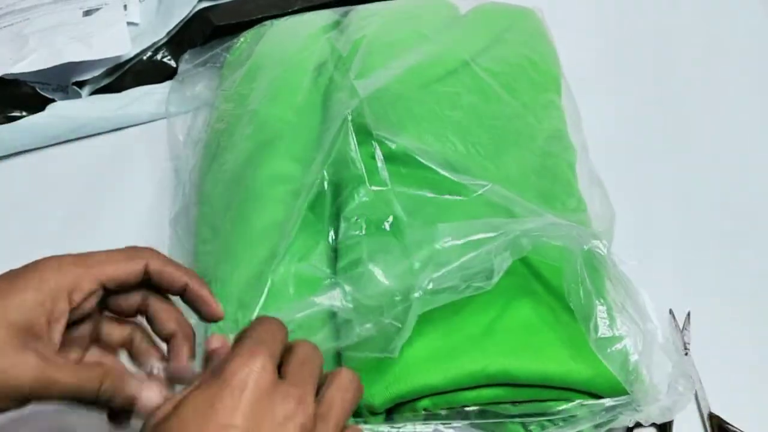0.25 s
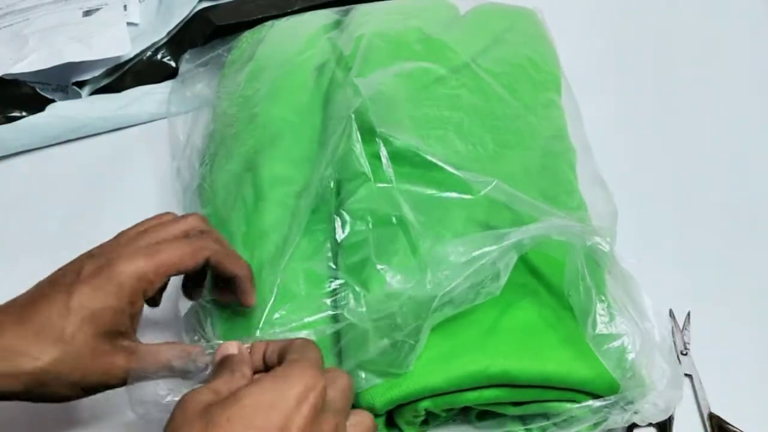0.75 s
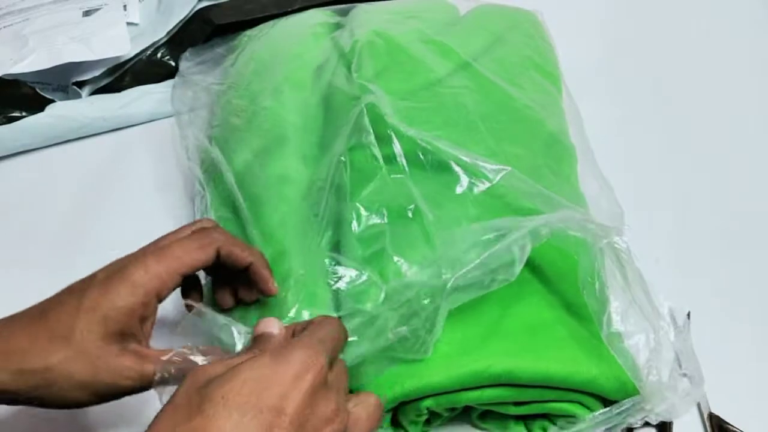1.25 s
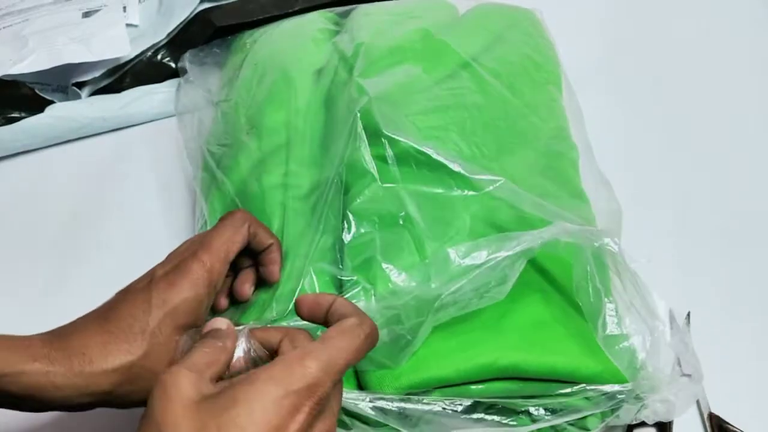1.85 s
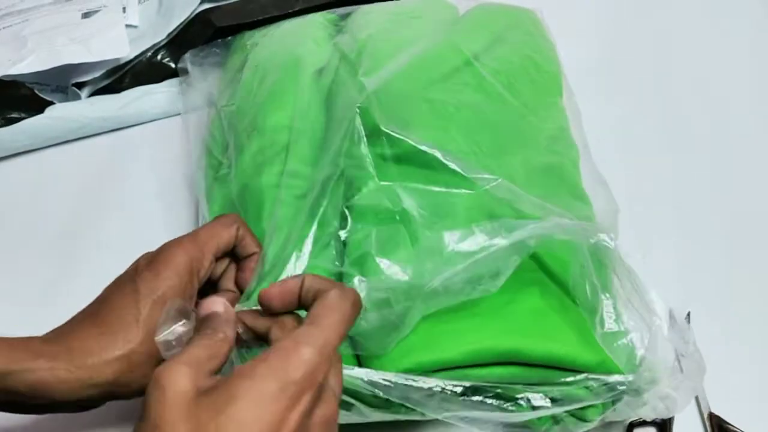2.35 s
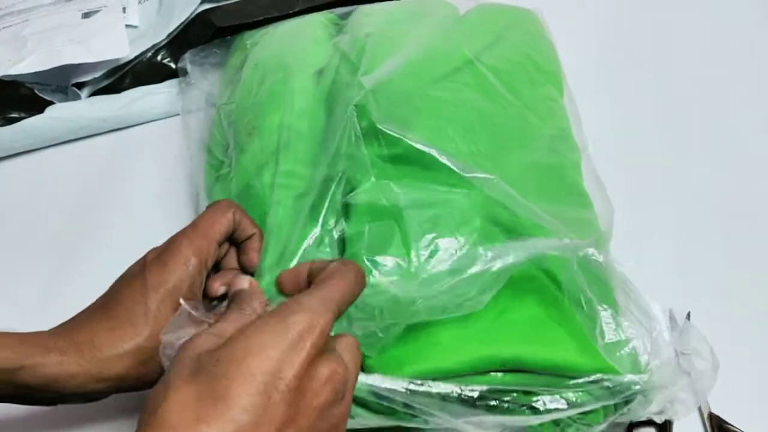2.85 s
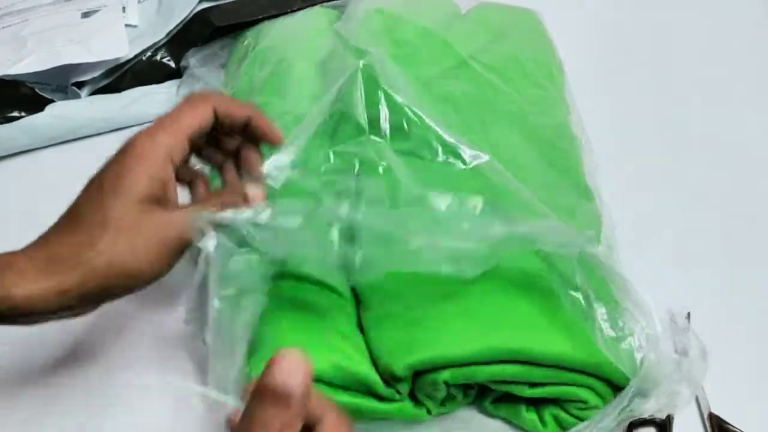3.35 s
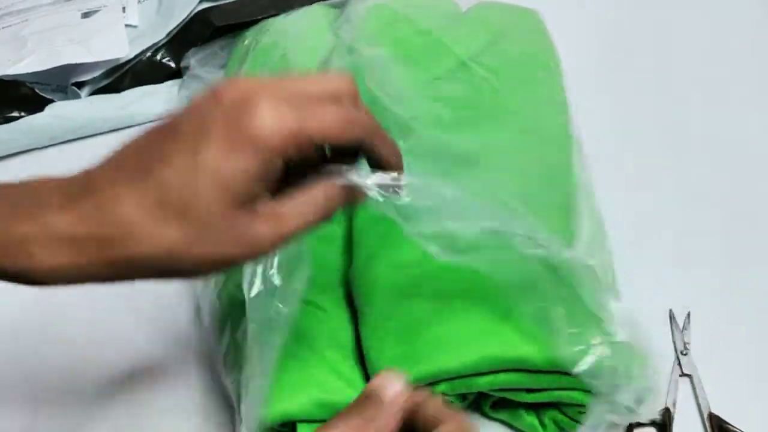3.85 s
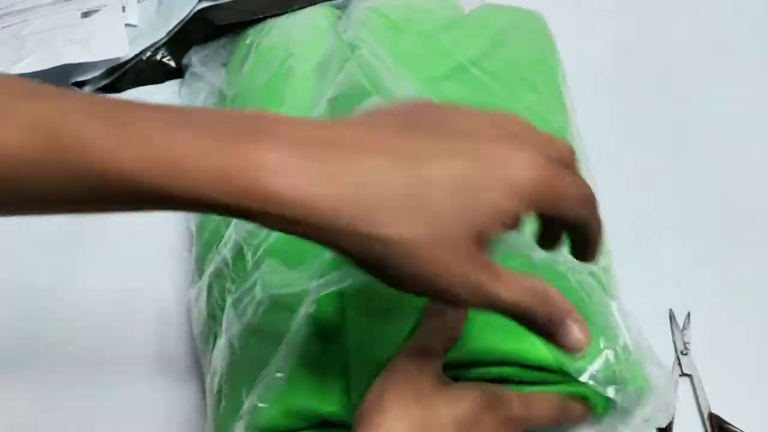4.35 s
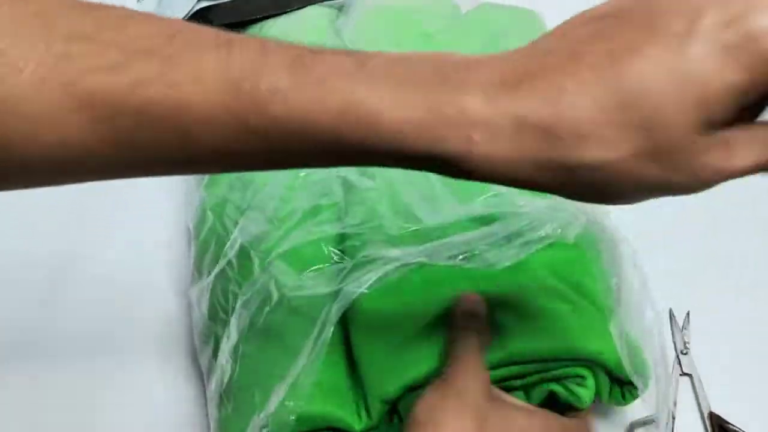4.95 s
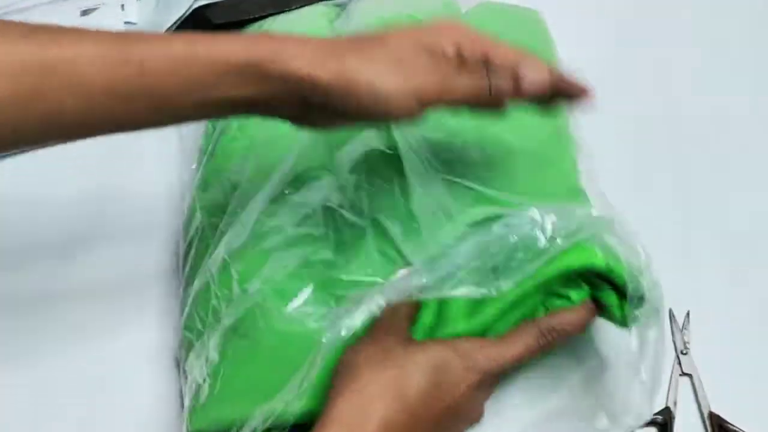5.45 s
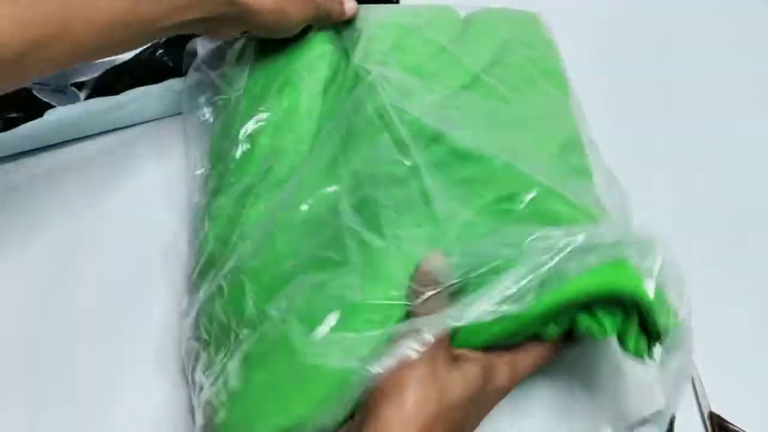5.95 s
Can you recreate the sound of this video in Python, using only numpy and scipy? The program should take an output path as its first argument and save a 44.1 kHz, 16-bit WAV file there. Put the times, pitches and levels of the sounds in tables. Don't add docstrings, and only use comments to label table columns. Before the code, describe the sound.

A thin polythene bag is handled very close to a stereo microphone, in a small room with short reflections and a faint steady hum. From 0 to 1.4 seconds, light irregular crinkling and tiny dry clicks, slightly right of centre, with brief lulls. From 1.5 to 1.9 the film gives in strong, separate snaps, with a soft low thump near 1.7. After quieter crackle, a dense, bright tearing burst hits at 2.3 and dies fast, with another snap at 2.4. Between 2.84 and 3.03 a hard rip breaks in several loud pops, with a dull table thud at its end and another near 3.4. Then loose film rustles more gently, swelling around 3.9 and 4.7, shifting leftward. It almost stops near 5.1, rustles briskly at 5.2, then fades to small crackles, soft bumps and a slight renewed crinkle by 6.1.

```python
import sys
import numpy as np
from scipy import signal
from scipy.fft import rfft, irfft
from scipy.io import wavfile

SR = 44100
rng = np.random.default_rng(int(sys.argv[2]) if len(sys.argv) > 2 else 0)


def unload_audio(sound):
    columns = np.transpose(np.atleast_2d(sound))
    steps = np.round(np.clip(columns, -1, 1) * 32767)
    wavfile.write(sys.argv[1], SR, steps.astype(np.int16))


def gain_from_db(level_db):
    decades = np.asarray(level_db, float) / 20
    return 10 ** decades


N = 272538
SNAP_PAN_SPREAD_DB = 2.2

# [t/s, left port lag/samples, left-right level/dB]
HANDS = [
    (0, 6, -1.3),
    (1.5, 6.5, -1.4),
    (4.1, 6, -0.1),
    (4.5, -1, 1.5),
    (6.18, -3, -0.5),
]


def rms_one(x):
    return x / np.sqrt(np.mean(x ** 2) + 1e-20)


def in_time(rows, s):
    table = np.array(rows)
    return [np.interp(s, table[:, 0], column) for column in table[:, 1:].T]


def at_hz(points, hz):
    table = np.array(points)
    return np.interp(np.log(hz), np.log(table[:, 0]), table[:, 1])


def drift(rate_hz):
    r = np.exp(-2 * np.pi * rate_hz / SR)
    noise = rng.standard_normal(N + SR)
    return rms_one(signal.lfilter([1], [1, -2 * r, r * r], noise)[SR:])


def diffuse(hz, length):
    # [f/Hz, share]
    likeness = [(100, 0.81), (300, 1), (700, 0.36), (1500, 0.032), (4000, 0.0082)]
    mid, side = rfft(rng.standard_normal((2, length)))
    alike = np.clip(at_hz(likeness, hz), 0, 1)
    return np.sqrt(1 + alike) * mid + np.sqrt(1 - alike) * side * [[1], [-1]]


def hum():
    # [f/Hz, density/dB per Hz]
    hum_spectrum = [(25, -8), (45, -22), (65, -8), (95, -3), (130, 3.5), (300, -13), (550, -3.5),
                    (1100, -10), (2600, -19), (3800, -21), (6400, -20), (9000, -22.5), (16000, -33)]
    hz = np.maximum(np.fft.rfftfreq(N, 1 / SR), 1)
    noise = irfft(diffuse(hz, N) * gain_from_db(at_hz(hum_spectrum, hz)), N)
    return gain_from_db(-68.5) * rms_one(noise)


def thrust_db():
    # [t/s, peak level/dB]
    thrusts = [(1.72, -55), (2.49, -64), (3.01, -49.5), (3.3, -58), (3.42, -48.5), (3.85, -60), (4.0, -59),
               (4.7, -53.5), (5.2, -62), (5.82, -60), (6.1, -63)]
    rise_db_per_s, fall_db_per_s, rest_db = 81, 91, -71
    at_s, peak_db = np.transpose(thrusts)[:, :, None]
    since_s = np.arange(N) / SR - at_s
    each_db = peak_db + np.where(since_s < 0, rise_db_per_s, -fall_db_per_s) * since_s
    return np.maximum(each_db.max(axis=0), rest_db)


def rumble(low_hz=65, high_hz=150, side_db=-11):
    sos = signal.butter(3, [low_hz, high_hz], "band", fs=SR, output="sos")
    mid, side = rms_one(signal.sosfilt(sos, rng.standard_normal((2, N))))
    return gain_from_db(thrust_db() - 7.0) * (mid + gain_from_db(side_db) * side * [[1], [-1]])


def response(walls_db=-7, build_s=0.0029):
    # [delay/s, left level/dB, right level/dB]
    echoes = [
        (.0026, -19.5, -19),
        (.0045, -29.5, -15),
        (.0092, -19.5, -20),
    ]
    # [f/Hz, T60/s]
    room_t60 = [(150, 0.52), (1000, 0.26), (6000, 0.22), (15000, 0.049)]
    length = SR // 2
    s = np.arange(length) / SR
    hz = np.maximum(np.arange(length // 2 + 1) * 2, 1)
    noise, tail = diffuse(hz, length), 0
    for centre_hz in 125 * 2 ** np.arange(8):
        octave = np.cos(np.pi / 2 * np.clip(np.log2(hz / centre_hz), -1, 1)) ** 2
        tail = tail + irfft(noise * octave) * gain_from_db(-60 * s / at_hz(room_t60, centre_hz))
    tail = tail * (1 - np.exp(-s / build_s))
    out = gain_from_db(walls_db) * tail / np.sqrt(np.sum(tail ** 2, axis=1, keepdims=True))
    out[:, 0] = 1
    for delay_s, left_db, right_db in echoes:
        out[:, round(delay_s * SR)] += gain_from_db(np.array([left_db, right_db]))
    return out


def room(x, count=6, place_s=0.06):
    place = np.arange(N) / (place_s * SR)
    out = 0
    for k in range(count):
        distance = np.abs((place - k + count / 2) % count - count / 2)
        share = np.clip(1 - distance, 0, 1)
        out = out + signal.fftconvolve(x * share, response(), axes=1)[:, :N]
    return out


def ports(x, low_cut_hz=165):
    # [f/Hz, width/Hz, level/dB]
    port_peaks = [
        (250, 17, 4),
        (760, 1340, -3),
        (4116, 1630, -10.5),
        (6146, 1340, 8.5),
        (8260, 5500, -11.5),
        (15560, 2900, 10),
    ]
    for hz, width_hz, db in port_peaks:
        w, g = 2 * np.pi * hz / SR, gain_from_db(db / 2)
        a = np.tan(np.pi * width_hz / SR)
        x = signal.lfilter([1 + a * g, -2 * np.cos(w), 1 - a * g], [1 + a / g, -2 * np.cos(w), 1 - a / g], x)
    return signal.sosfilt(signal.butter(4, low_cut_hz, "high", fs=SR, output="sos"), x)


def fold_filters():
    fold_edges_hz = [600, 3800, 8200]
    low, mid, high = fold_edges_hz
    ranges = [(low, "low"), ([low, mid], "band"), ([mid, high], "band"), (high, "high")]
    return [signal.butter(2, edge, kind, fs=SR, output="sos") for edge, kind in ranges]


def unit_peak(sos):
    return np.abs(ports(signal.sosfilt(sos, np.eye(1, 2048)[0]))).max()


def at_ports(at, sizes, lag, pan_db):
    trains = np.full((2, N + 64), 1e-18)
    left_at = np.clip(at + np.round(lag).astype(int), 0, N)
    np.add.at(trains[0], left_at, sizes * gain_from_db(pan_db / 2))
    np.add.at(trains[1], at, sizes * gain_from_db(-pan_db / 2))
    return trains[:, :N]


def clicks(delay_s=0.00046):
    # [t/s, peak level/dB, folds re peak/dB, fine creases re peak/dB]
    lone_clicks = [(0.0188, -39, -15, -5), (0.049, -47, -22, -7), (0.0835, -41, -8, -4),
                   (0.1513, -44, -4, -14), (0.1964, -51, -14, -8), (0.3073, -43.5, 0, -10),
                   (0.3709, -51, -11, -14), (0.431, -41, -13, -11), (0.488, -46, -9, -10),
                   (0.5433, -41, -9, -1), (0.6289, -49, -13, 11), (0.6969, -55, -10, -7),
                   (0.7035, -51, 0, -5), (0.75, -43, -5, -17), (0.7869, -48, -6, -18),
                   (0.7945, -55, -7, -1), (0.821, -38, -10, -13), (0.8402, -39, -10, -13),
                   (0.8456, -43, -3, -8), (0.865, -41, -9, -15), (0.93, -37, -6, -10),
                   (1.0375, -49, -18, -5), (1.1697, -36, -10, -9), (1.2776, -37.5, -3, -15),
                   (1.314, -45, -22, -13), (1.3298, -44, -10, 2), (1.387, -50, -14, -6),
                   (1.4384, -42, -23, -9), (1.4875, -28.5, -10, -11), (1.5363, -40, -9, -9),
                   (1.6728, -27, -9, -10), (1.9901, -47, -10, -13), (2.098, -38, -13, -3),
                   (2.1226, -44, -20, -5), (2.1402, -49, -19, -14), (2.1476, -44, -11, -6),
                   (2.1675, -36, -8, -11), (2.2035, -31, -3.5, -13), (2.2368, -44, -9, -12),
                   (2.2546, -37, -4, -15), (2.276, -40, -16, -16), (2.2921, -19, 0, -8),
                   (2.5617, -39, -16, 1), (2.587, -49, -17, -14), (2.6945, -47, -7, -13),
                   (2.7168, -45, -8, -12), (2.7542, -31, -17, -15), (2.8292, -38, -8, -9),
                   (3.141, -46, -16, 6),
                   (3.1863, -49, -19, -10), (3.2514, -36, -10, -4), (3.3552, -35.5, -9, -13),
                   (3.359, -37, -13, -14), (3.3859, -55, -10, 0), (3.5945, -50, -11, 2),
                   (3.6384, -43, -8, -9), (3.6796, -41, 0, -7), (3.7331, -49, -21, -15),
                   (3.8091, -46, -9, 3), (3.8544, -38, -7, -3), (4.1821, -47, -5, -19),
                   (4.2731, -53, -11, -14), (4.2891, -41, -16, -12), (4.3268, -48, -22, -10),
                   (4.4019, -44, -10, -11), (4.4324, -52, -10, -9), (4.4429, -44, -7, -6),
                   (4.4572, -38, -2, -8), (4.5051, -48, -9, -10), (4.6178, -40, -14, -1),
                   (4.6659, -49, -14, -13), (4.7119, -37, -10, -8), (4.7658, -29, -17, -3),
                   (4.7909, -32.5, -17, 5), (4.8404, -39, -17, -12), (4.9258, -48, -19, -14),
                   (4.9648, -46.5, -5, -13), (5.0365, -55.5, -12, -20), (5.0738, -61, -14, -13),
                   (5.1341, -50, -10, -10), (5.1437, -39, -17, -5), (5.1613, -40, -15, -9),
                   (5.1803, -28, -14, -10), (5.3416, -50, -2, -11), (5.3545, -47, -7, -12),
                   (5.41, -32, -26, -10), (5.4436, -37.5, -6, -9), (5.5502, -54, -10, -17),
                   (5.5615, -44, -10, -7), (5.6529, -46, -11, -16), (5.7227, -48, -9, -6),
                   (5.7519, -46, -15, -14), (5.7926, -56, -9, -4), (5.8842, -43, -6, -13),
                   (5.9165, -42, -2, -10), (6.0476, -42, -19, -10), (6.0783, -41, -7, -4),
                   (6.101, -41, -20, -13)]
    click_trim_db = [-13, 4, 3.5, 7]
    s, peak_db, fold_db, fine_db = np.transpose(lone_clicks)
    chance = rng.standard_normal((len(s), 3))
    lag, pan_db = in_time(HANDS, s)
    lag = lag + 1.6 * chance[:, 0]
    pan_db = pan_db + SNAP_PAN_SPREAD_DB * chance[:, 1]
    at = np.round(SR * (s + delay_s)).astype(int)
    out = 0
    for k, (sos, rel_db) in enumerate(zip(fold_filters(), [fold_db, fold_db, 0 * s, fine_db])):
        sizes = np.sign(chance[:, 2]) * gain_from_db(peak_db + rel_db + click_trim_db[k]) / unit_peak(sos)
        out = out + (-1) ** k * signal.sosfilt(sos, at_ports(at, sizes, lag, pan_db))
    return ports(out)


def panels(at, level_db, panel_hz, lag, pan_db, trim_db=-5, cycles=15):
    step = np.arange(1024)
    turns = panel_hz[:, None] * step / SR
    rings = gain_from_db(level_db[:, None] + trim_db - 60 * turns / cycles) * np.sin(2 * np.pi * turns)
    ring_at = np.minimum(at[:, None] + step, N)
    return at_ports(ring_at.ravel(), rings.ravel(), np.repeat(lag, step.size), np.repeat(pan_db, step.size))


def snaps(first_db=6, fade_db=-0.23, uneven_db=3, rise_s=.0006, burst_s=.0026, count=10):
    # [t/s, peak level/dB, folds re peak/dB, panel f/Hz]
    picking = [(0.019, -39.5, 0, 507), (0.0874, -38.5, -6, 2120), (.11, -38, -17, 880),
               (0.205, -41, -4, 1540), (.2209, -40, -29, 1030), (0.266, -43, 1, 960),
               (0.339, -44, 6.5, 2150), (0.3877, -37.5, -33, 1730), (0.4181, -40.5, 4.5, 1460),
               (0.445, -46, -2, 501), (0.4977, -38, -9, 650), (0.526, -34.5, -16, 824),
               (.606, -51, -27, 627), (0.637, -40, -17, 1240), (0.749, -52, 9.5, 1960),
               (0.948, -34.5, -27, 2440), (1.0239, -30, -13, 1720), (1.1174, -37.5, -23, 770),
               (1.15, -38, -8, 1470), (1.2124, -32.5, -12, 520), (1.265, -35.5, -16, 1350),
               (1.3514, -31.5, -18, 900), (1.3414, -32.5, -11, 905), (1.3472, -33, -27, 797),
               (1.417, -37.5, -25, 519), (1.461, -36, -26, 517), (1.479, -24.5, -33, 799)]
    seam = [(1.5479, -22, -10, 1960), (1.5915, -18.5, -0.5, 1520), (1.677, -15, -5, 1900),
            (1.7137, -17, -0.5, 1530), (1.7267, -21, -1.5, 950), (1.7301, -23, -3, 1500),
            (1.685, -32, -6, 1200), (1.753, -18, -1.5, 930), (1.8429, -16, -1.5, 838),
            (1.8792, -12, -6, 653), (2.0185, -46, -11, 603), (2.0686, -31.5, -17, 1302),
            (2.081, -31.5, -17, 2220), (2.162, -41, 2, 1520), (2.4053, -18, -9.5, 605),
            (2.5397, -38, -24, 1790), (2.5578, -35, -26, 807), (2.6481, -30.5, -11, 830),
            (2.7432, -36, 5.5, 1500), (2.764, -34.5, -0.5, 1200)]
    tear = [(2.284, -25.5, -5, 1510), (2.2868, -17.5, 0.5, 970), (2.2895, -23, -2, 1900),
            (2.293, -24, 4, 1230), (2.2955, -23.5, -1, 900), (2.3025, -20, -8, 2100),
            (2.3095, -17, -2.5, 1110), (2.3245, -19, -8, 1300), (2.3375, -22, 0.5, 1400),
            (2.345, -30, -3, 1800), (2.300, -16.5, -6, 910), (2.308, -28, -5, 990), (2.312, -18, -19, 900),
            (2.317, -24, -3, 1930), (2.32, -18.5, 0.5, 1100), (2.329, -22, 4, 980), (2.335, -24, -10, 1090),
            (2.3392, -22, -11, 2100), (2.353, -24.5, -4, 1520), (2.362, -28, -26, 900)]
    rip = [
        (2.8377, -21, -3.5, 570),
        (2.8737, -20.5, 2, 820),
        (2.8767, -17.5, -0.5, 835),
        (2.8801, -28, -6, 1510),
        (2.8892, -16.5, -9, 651),
        (2.9428, -19, -4, 815),
        (2.9884, -15.5, -4.5, 517),
        (3.0218, -25.5, -0.5, 1410),
        (3.027, -26, -7, 511),
        (3.0349, -26.5, 0.5, 1140),
    ]
    opening = [(3.2003, -31.5, -30, 2050), (3.4055, -30.5, -16, 2130), (3.5115, -39.5, 1, 1550),
               (3.6208, -41, 0, 900), (3.7509, -33.5, 0, 2800), (3.839, -39, -6, 620),
               (3.8799, -33.5, -9, 1383), (3.9505, -29, -13, 536), (4.009, -42, -10, 3180),
               (4.044, -43, -22, 501), (5.768, -48, 7.5, 970), (5.805, -50.5, 8, 980), (5.84, -48, 5, 596),
               (5.858, -43.5, 4.5, 1500), (5.913, -43, 2, 523), (6.152, -40, 3, 1800),
               (6.163, -40, 3, 1750), (6.062, -52, -4, 700), (4.517, -39, 7, 1670), (4.578, -31.5, -9, 824),
               (4.611, -32, -7, 790), (4.7084, -30, -18, 1440), (5.1929, -33, -25, 506),
               (5.2932, -37, -14, 2430), (5.489, -41.5, -3, 1490), (5.604, -39.5, -14, 1000),
               (5.878, -48, -7, 620), (6.0647, -47, -27, 510), (6.083, -35, -23, 1490)]
    knocks = [(4.233, -57.5, 9, 330), (4.7, -51, 12.5, 350), (3.6, -63, 11, 370), (4.277, -56, 13, 460),
              (5.9, -55, 13, 560), (4.291, -56, 11, 400), (4.301, -52, 14, 400), (4.312, -63, 10, 340),
              (2.989, -36, 7.5, 238), (2.5, -40, -25, 220), (0.014, -50, 8, 540), (5.85, -56, 10, 580),
              (6.07, -51, 14, 600), (6.15, -53, 13, 450), (3.01, -43, 7, 190)]
    # [t/s, peak level/dB]
    ticks = [(.11, -46), (0.607, -43.5), (0.9483, -54), (1.5923, -27), (1.676, -50), (1.7137, -27),
             (2.352, -40), (2.6477, -57), (2.9869, -23), (3.949, -38), (4.7077, -40), (5.1938, -46),
             (5.2918, -52), (5.8764, -44), (6.083, -45), (3.2006, -56), (3.57, -62), (3.68, -51),
             (4.045, -41), (4.899, -59), (1.0245, -40), (.388, -55), (1.8423, -27), (1.8777, -42),
             (2.8893, -50), (4.98, -68), (5.49, -62), (5.565, -62), (5.655, -53), (5.725, -60), (5.83, -56),
             (5.918, -56), (5.98, -54)]
    snap_trim_db = [-7.5, -4, -0.74, -2.5]
    after_db = [-33, -6, -4.5, -2]
    tick_fold_db, tick_hz, tick_fine_db, tick_after_db = -1.5, 1970, 29, -7
    knock_broad_db, knock_dull_db = 26, -25
    colour_db = 6.5

    tick_rows = [(t, db, tick_fold_db, tick_hz) for t, db in ticks]
    rows = picking + seam + tear + rip + opening + knocks + tick_rows
    s, peak_db, fold_db, panel_hz = np.transpose(rows)
    index = np.arange(len(s))
    tick = index >= len(s) - len(ticks)
    knock = (index >= len(s) - len(knocks) - len(ticks)) & ~tick
    chance = rng.standard_normal((len(s), 4, count))

    broad_db = -22 + 0.16 * fold_db - 1.5 * np.log2(panel_hz / 1000) + knock_broad_db * knock
    broad_db = broad_db + colour_db * chance[:, 3, 2]
    fine_db = -14 + tick_fine_db * tick + colour_db * chance[:, 3, 3]
    dull_db = knock_dull_db * knock
    rel_levels_db = [broad_db, fold_db + dull_db, dull_db, fine_db + dull_db]

    step = np.arange(count)
    after_s = burst_s * step / count * np.exp(.3 * chance[:, 0])
    at = np.round(SR * (s[:, None] + rise_s + after_s)).astype(int)
    run_db = np.where(step, fade_db * step + uneven_db * chance[:, 2], first_db)
    run = np.sign(chance[:, 1]) * gain_from_db(run_db)
    lag, pan_db = in_time(HANDS, s)
    lag = lag + 1.6 * chance[:, 3, 1]
    pan_db = pan_db + SNAP_PAN_SPREAD_DB * chance[:, 3, 0]

    out = panels(at[:, 0], peak_db + fold_db, panel_hz, lag, pan_db)
    for k, (sos, rel_db) in enumerate(zip(fold_filters(), rel_levels_db)):
        moved = run * gain_from_db((after_db[k] + tick_after_db * tick[:, None]) * (step > 0))
        sizes = moved * gain_from_db(peak_db + rel_db + snap_trim_db[k])[:, None] / unit_peak(sos)
        trains = at_ports(at.ravel(), sizes.ravel(), np.repeat(lag, count), np.repeat(pan_db, count))
        out = out + (-1) ** k * signal.sosfilt(sos, trains)
    return ports(out)


def pause_db(s):
    # [centre t/s, depth/dB (negative: a brief swell), sink/s, recover/s]
    pauses = [(.62, 11, 0.028, .01), (1.426, 10, 0.073, 0.015), (2.28, 3.5, 0.015, .003),
              (2.98, -1, .03, .005), (2.866, 13, 0.017, .006), (2.935, 5, .02, .005),
              (3.6, 5.5, 0.08, 0.016), (4.2, 4.5, 0.22, 0.075), (4.37, 9, 0.077, 0.018),
              (5.115, 13, 0.2, 0.0066), (5.53, 9.5, 0.025, 0.032), (5.71, 5.5, 0.029, 0.039),
              (4.95, 2.5, 0.088, 0.037), (1.585, -7, 0.026, .005), (1.668, 5, 0.035, .005),
              (1.838, 9, 0.043, .004), (4.26, 0.5, 0.072, .06), (5.98, 4.5, 0.07, 0.031)]
    at_s, depth_db, sink_s, recover_s = np.transpose(pauses)[:, :, None]
    since_s = s - at_s
    distance = np.where(since_s < 0, -since_s / sink_s, since_s / recover_s)
    return -np.sum(depth_db * np.clip(1 - distance, 0, 1), axis=0)


def fold_levels():
    # [t/s, effort/dB, tautness/dB]
    handling = [(0, -59, 3), (.23, -57, -3), (.29, -75, 5), (.31, -56.5, 0.5), (.75, -61.5, -3.5),
                (1.0, -54.5, 3.5), (1.43, -54, 2.5), (1.96, -51.5, 2.5), (2.8, -54, 1.5), (3.6, -57.5, 1),
                (4.1, -50, -3.5), (4.2, -63.5, -15), (4.33, -68, 8), (4.4, -76, 7), (5.0, -86, 14),
                (5.12, -96, 9), (5.25, -54.5, -2.5), (5.93, -56.5, -5.5), (6.18, -47.5, 1.5)]
    # [start t/s, rise/s, peak level/dB, fall/dB per s, tautness/dB]
    tugs = [(0, 0.03, -49.5, 400, 8), (1.431, 0.064, -50, 142, -1), (1.6, 0.16, -52, 98, 19),
            (1.832, 0.017, -58, 75, 23), (2.285, 0.0055, -31, 165, 10), (2.5, 0.052, -59, 97, 15),
            (2.84, 0.038, -37, 180, 9), (2.985, 0.012, -39, 151, 9), (3.63, 0.046, -54, 94, 5),
            (3.829, 0.059, -43.5, 79, 1), (3.9, 0.03, -49, 70, -1), (3.96, 0.022, -54, 80, 12),
            (4.03, 0.039, -53.5, 72, -9), (4.42, 0.052, -51.5, 37, 4.5), (4.38, 0.025, -60, 30, 1),
            (4.5, 0.19, -45.5, 62, 1), (4.74, 0.061, -52.5, 110, -1), (5.125, 0.083, -44, 298, 4),
            (5.53, 0.14, -55.5, 203, 0), (5.75, 0.023, -59.5, 200, -10), (5.82, 0.03, -56.5, 120, -5),
            (5.89, .025, -58, 150, -4), (3.15, 0.12, -54, 98, 1), (3.36, 0.093, -55.5, 120, 1),
            (6.02, 0.03, -57, 102, 16), (.5, 0.051, -56.5, 73, 8)]
    fold_base_db = [-6, -1, -0.5, -12.5]
    effort_shares = [.9, .95, 1.01, 1.3]
    taut_shares = [-0.48, -0.18, 0.52, 0.93]
    middle_db, swell_db = -52, 8.5
    s = np.arange(0, N, 32) / SR
    start_s, rise_s, peak_db, fall_db_per_s, tug_taut = np.transpose(tugs)[:, :, None]
    since_s = s - start_s - rise_s
    shape_db = np.where(since_s < 0, swell_db * since_s / np.maximum(rise_s, .002), -fall_db_per_s * since_s)
    tug_db = peak_db + shape_db - 60.0 * (s < start_s)
    steady_db, steady_taut = in_time(handling, s)
    effort = np.vstack([steady_db, tug_db]) + pause_db(s) - middle_db
    taut = np.vstack([steady_taut, tug_taut + 0 * s])
    levels = []
    for base_db, follows, share in zip(fold_base_db, effort_shares, taut_shares):
        part_db = base_db + follows * effort + share * taut
        sum_db = middle_db + 10 * np.log10(np.sum(gain_from_db(2 * part_db), axis=0))
        levels.append(np.interp(np.arange(N) / SR, s, sum_db))
    return levels


def crinkle(per_s=2200, clump_db=3.5, size_db=2.0, colour_db=3.0, lag_spread=2.5, pan_spread_db=5.5):
    crinkle_trim_db = [-4.5, -1.5, -1, 4.5]
    crinkle_top_db = [-45, -43, -39, -36]
    clumps = drift(40) + .7 * drift(120)
    at = np.flatnonzero(rng.random(N) < per_s * gain_from_db(clump_db * clumps) / SR)
    sizes = gain_from_db(size_db * np.minimum(rng.exponential(1, at.size), 3.2)) * rng.choice([-1, 1], at.size)
    chance = rng.standard_normal((at.size, 6))
    lag, pan_db = in_time(HANDS, at / SR)
    lag = lag + lag_spread * chance[:, 4]
    pan_db = pan_db + pan_spread_db * chance[:, 5]
    out = 0
    for k, (sos, level_db) in enumerate(zip(fold_filters(), fold_levels())):
        trains = at_ports(at, sizes * gain_from_db(colour_db * chance[:, k]), lag, pan_db)
        gain = gain_from_db(np.minimum(level_db, crinkle_top_db[k]) + crinkle_trim_db[k])
        out = out + (-1) ** k * gain * rms_one(ports(signal.sosfilt(sos, trains)))
    return out


def scene():
    film = crinkle() + snaps() + clicks()
    return room(film) + rumble() + hum()


def low_pass(x):
    return signal.sosfilt(signal.butter(12, 16950, fs=SR, output="sos"), x)


def record(dry):
    mix = signal.sosfilt(signal.cheby2(14, 60, 16300, fs=SR, output="sos"), dry)
    return low_pass(mix)


dry = scene()
out = record(dry)
unload_audio(out)
```